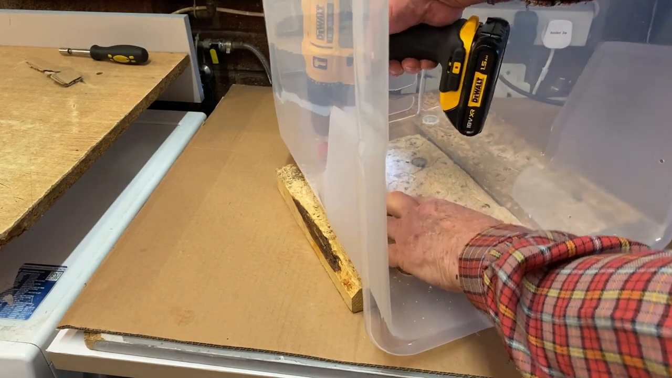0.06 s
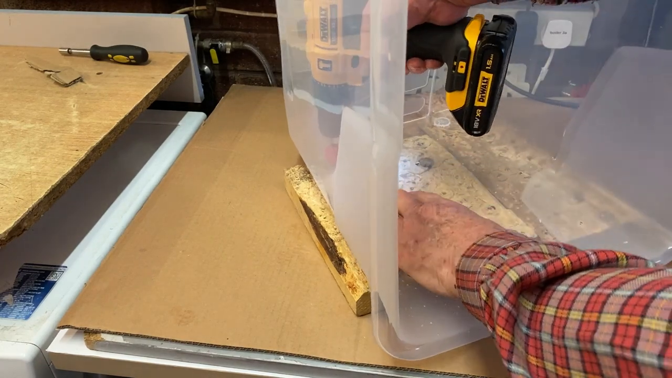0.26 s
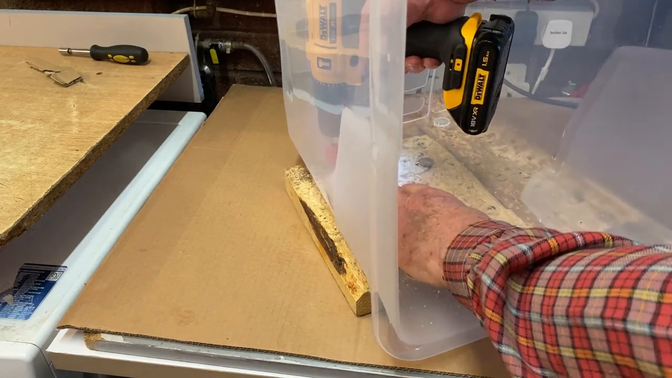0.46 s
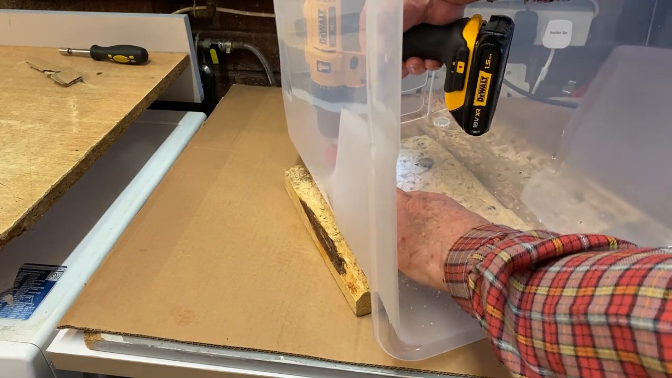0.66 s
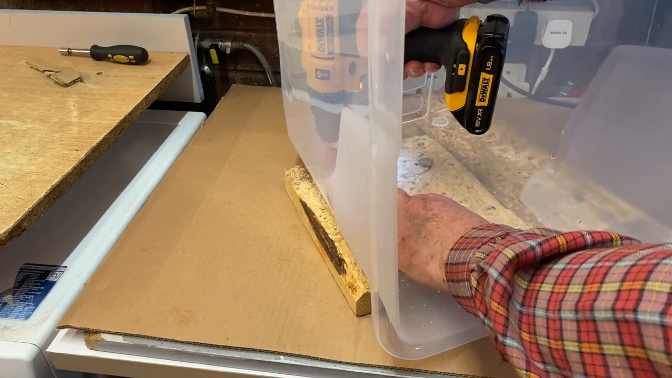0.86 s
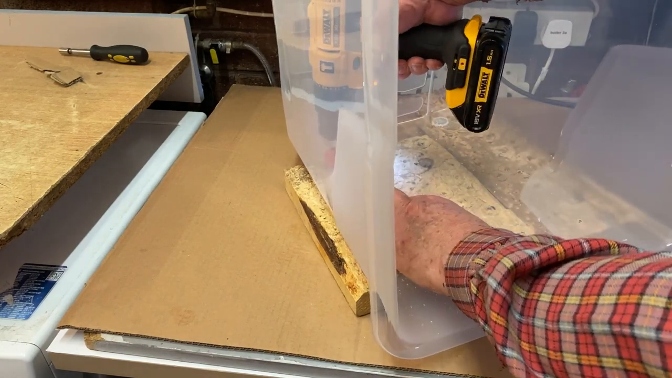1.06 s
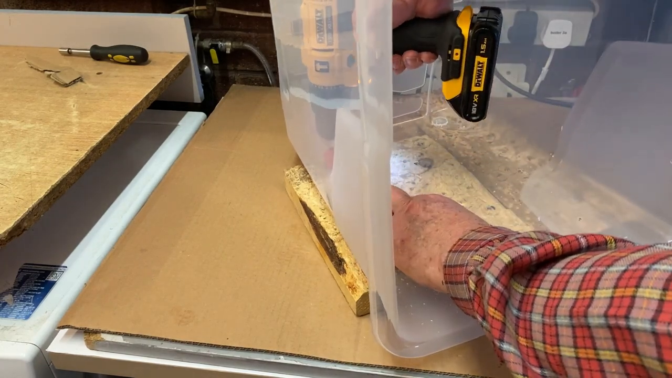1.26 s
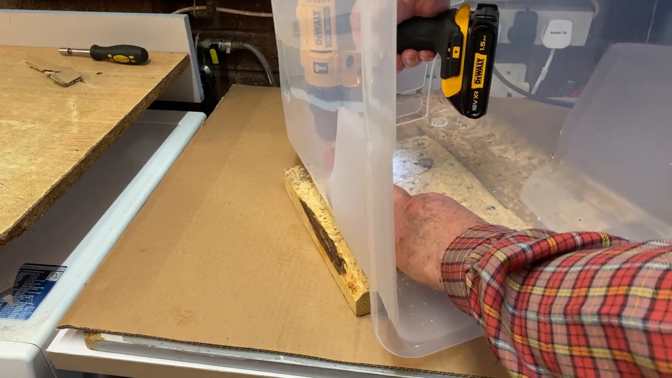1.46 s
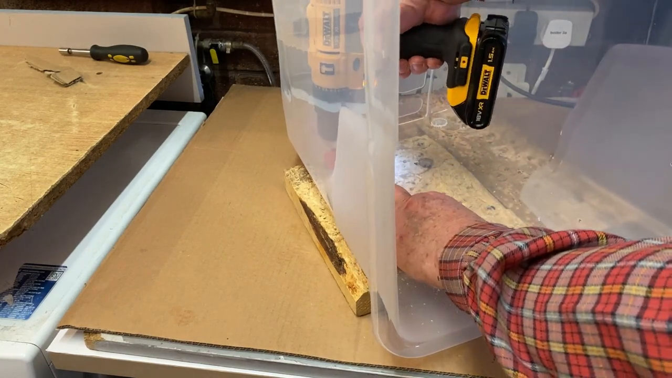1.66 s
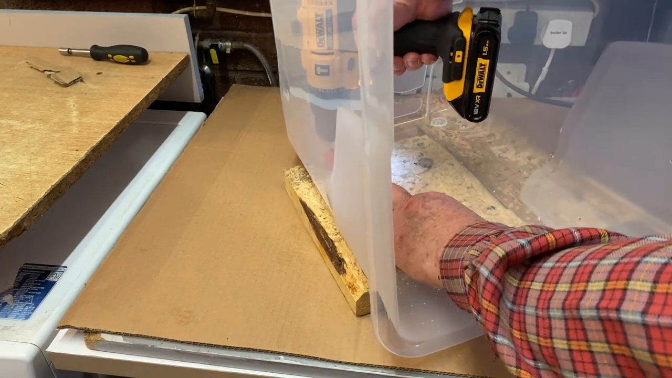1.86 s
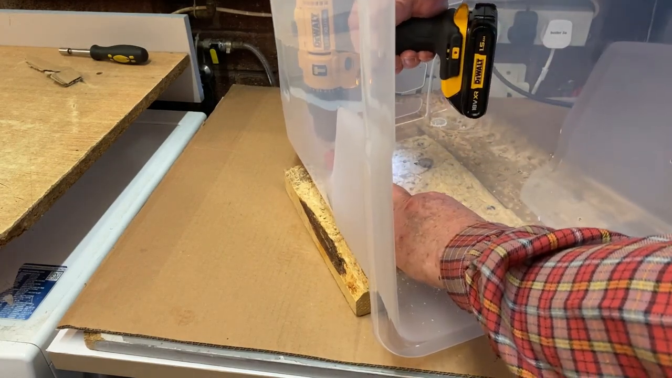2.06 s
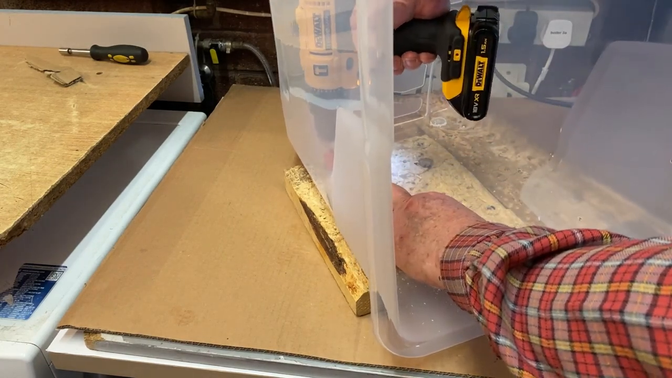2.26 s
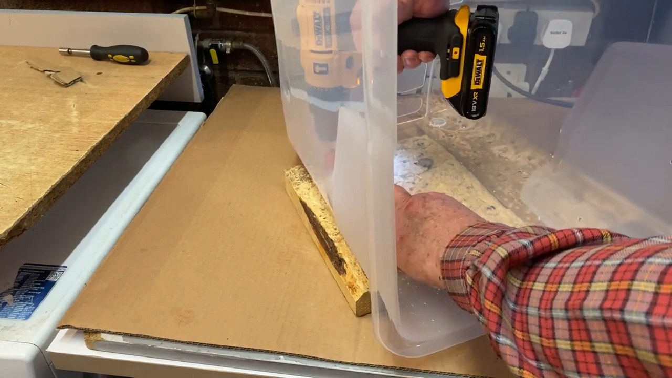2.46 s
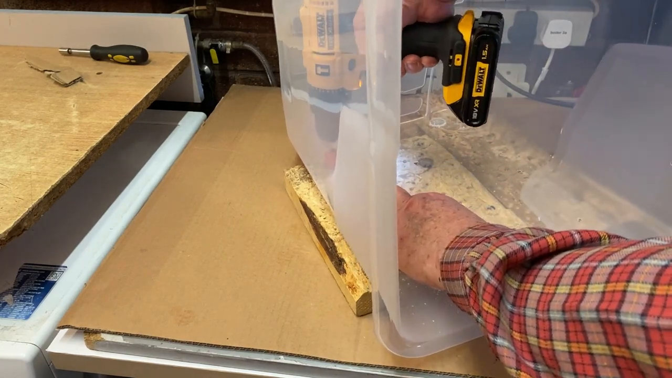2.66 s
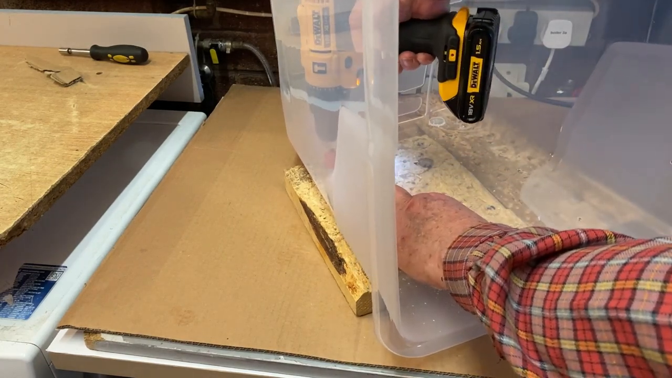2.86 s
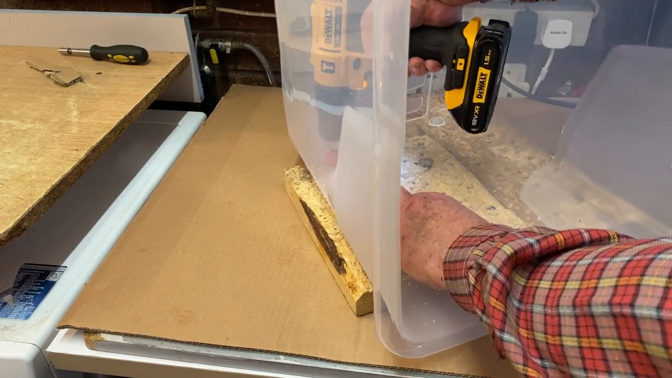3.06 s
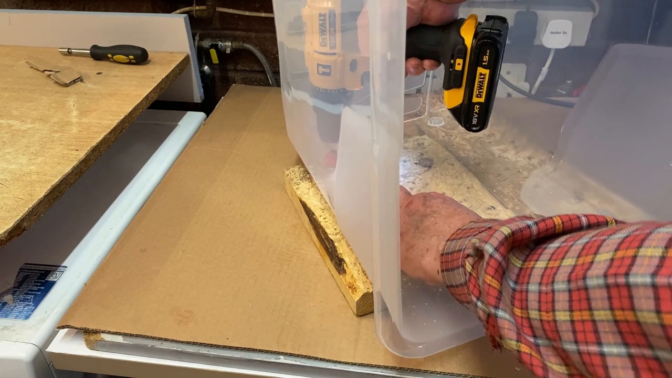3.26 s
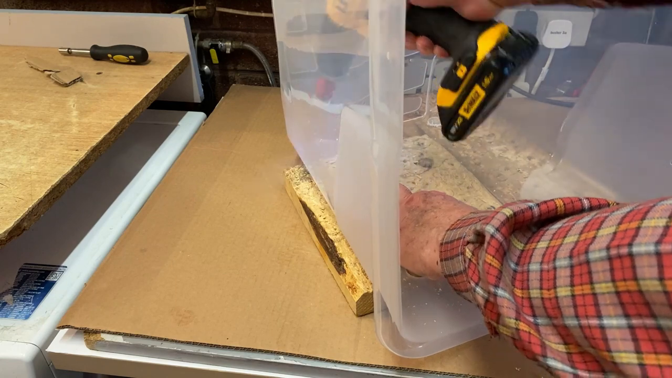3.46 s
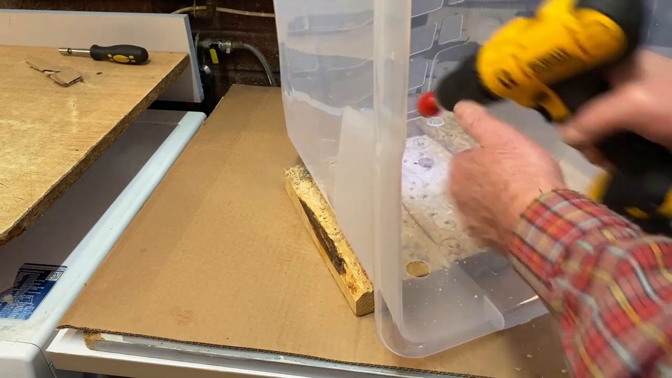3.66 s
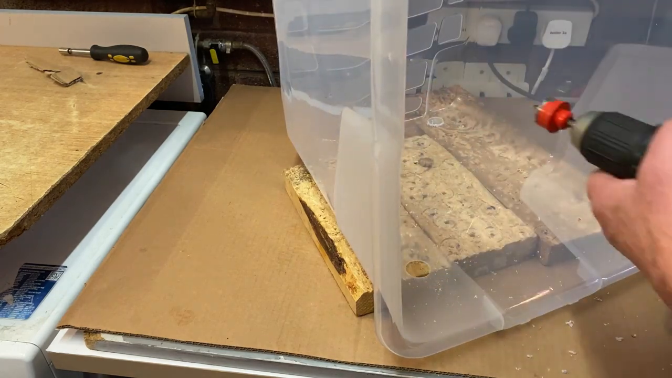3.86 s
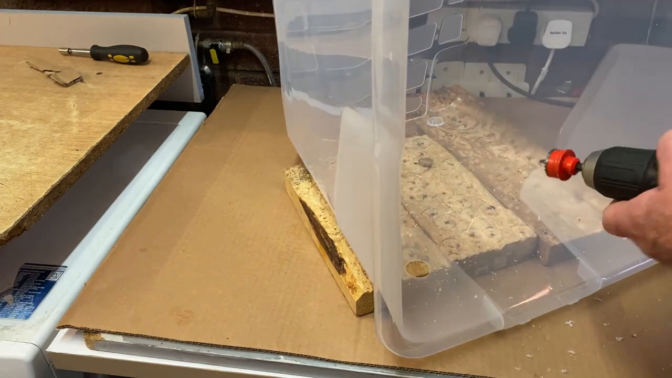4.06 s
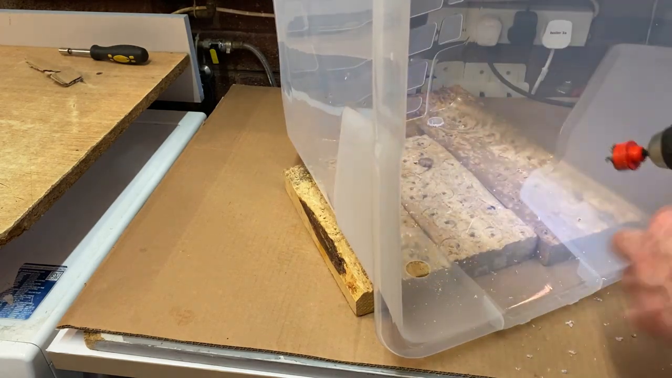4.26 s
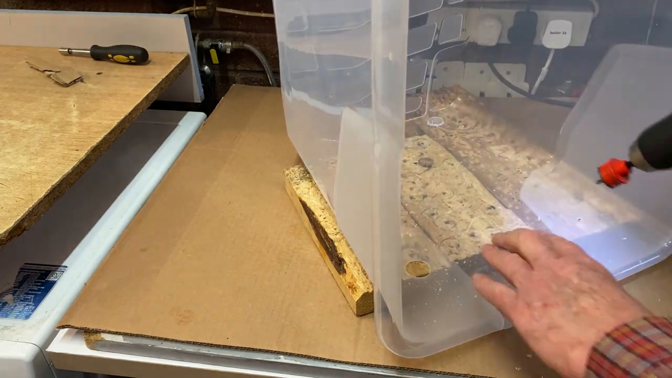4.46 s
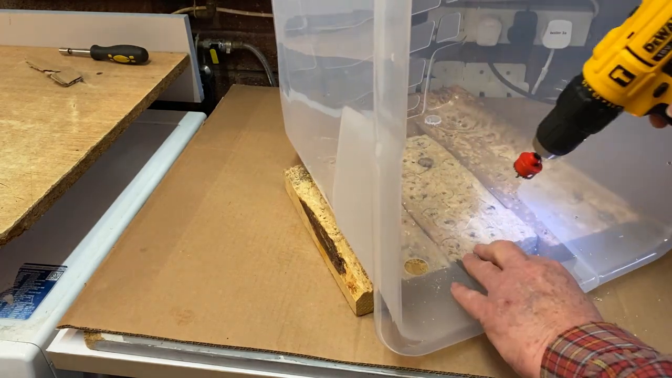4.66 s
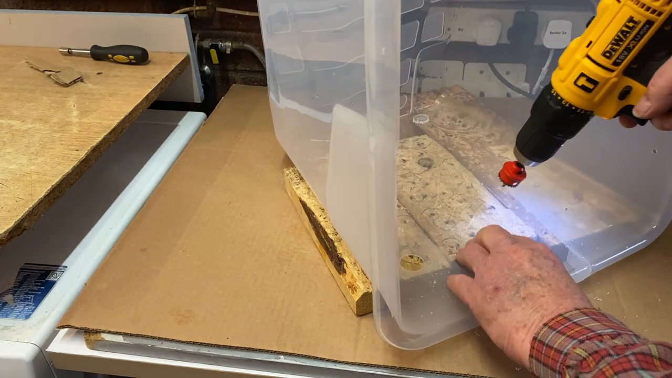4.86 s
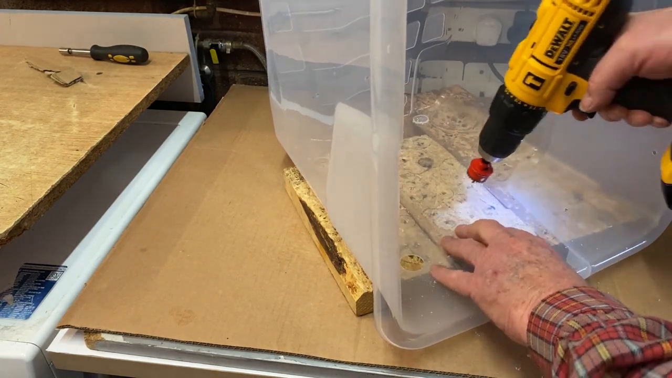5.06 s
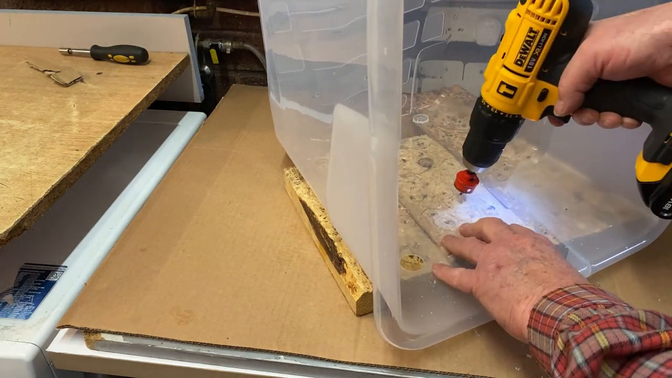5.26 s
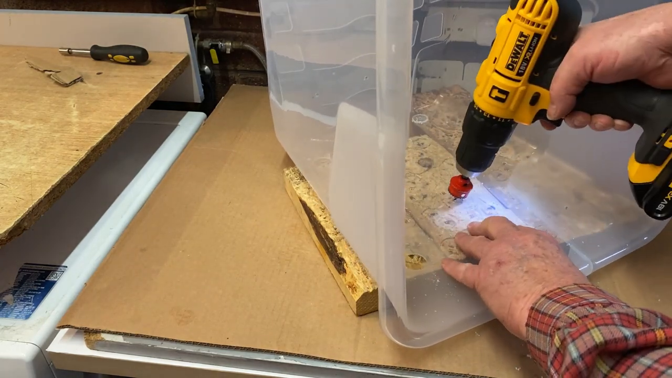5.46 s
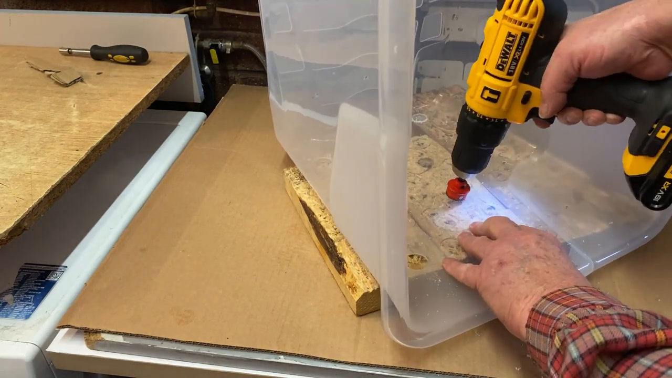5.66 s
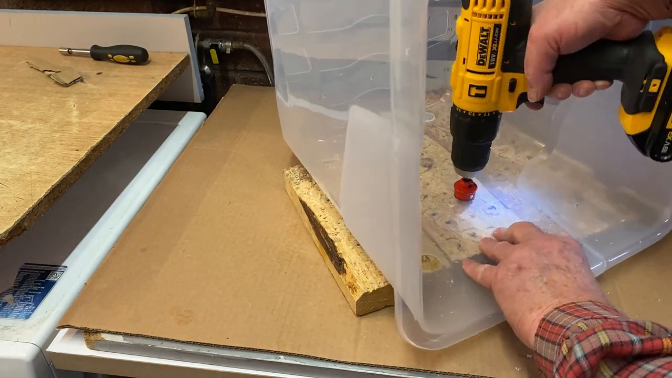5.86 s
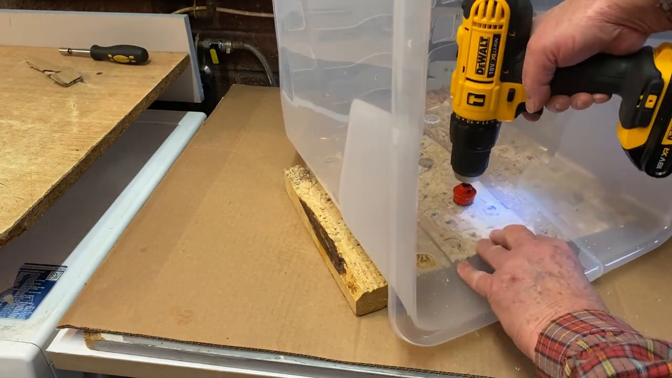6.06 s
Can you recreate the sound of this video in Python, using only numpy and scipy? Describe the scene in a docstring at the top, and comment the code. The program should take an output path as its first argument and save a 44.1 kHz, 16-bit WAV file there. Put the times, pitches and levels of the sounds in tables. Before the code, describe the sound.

Plastic box knocks, then a whining drill rasps and buzzes through its wall, brakes sharply, and leaves light handling bumps in a quiet workshop.

```python
"""Drilling a thin plastic box

A cordless drill drives a small hole saw through the wall of a plastic storage box on a workshop bench.
Gears are clicks coloured into hiss and mesh bands; sines at multiples of armature speed whine.
Saw teeth excite the wall modes and chatter by stick and slip; the braked chuck stops with a clack.
Before and after, pushes on the box modes make knocks and uneven grains make rubbing, in a faint shop hush."""
import sys
import numpy as np
from scipy import signal
from scipy.fft import rfft, irfft
from scipy.io import wavfile

SR = 44100
rng = np.random.default_rng(int(sys.argv[2]) if len(sys.argv) > 2 else 0)


def inscribe(sig):
    """Save sig as 16-bit PCM at rate SR to the path in sys.argv[1].

    A 1-D sig is mono; a 2-D sig holds one channel per row.
    Samples are clipped to [-1, 1] before scaling.
    """
    pcm = np.round(np.clip(np.atleast_2d(sig).T, -1, 1) * 32767)
    wavfile.write(sys.argv[1], SR, pcm.astype(np.int16))


N = 269010

# deep modes of the box: freq_hz, level_db, t60_s
DEEP_MODES = [(67, -6.5, 0.31), (95.8, -5.5, 0.17), (162, -3.5, 0.059)]
# low modes of the box: freq_hz, level_db, t60_s
LOW_MODES = [(208.6, -5, 0.098), (251, 0.5, 0.04), (276, -1, 0.033), (442.5, -11, 0.037),
             (566, -15.5, 0.0063), (355, -11.5, 0.023)]
# modes of the box wall, free to ring: freq_hz, level_db, t60_s
WALL_MODES = [(430, -10, .07), (590, -5, .04), (770, -8, .04), (900, -9, .03), (1110, 0, .055),
              (1400, 3.5, .05), (1614, -9, 0.033), (1760, -10.5, 0.04), (1985, 3.5, .045), (2090, -7, .03),
              (2260, -6.5, .035), (2768, -6, .025), (3000, -7, .03)]


def amp(db):
    """Amplitude ratio of a level in dB."""
    return 10 ** (np.asarray(db) / 20)


def rms_one(x):
    """Scale to an RMS of 1."""
    return x / np.sqrt(np.mean(x ** 2) + 1e-20)


def band_filter(x, order, corner_hz, kind="low"):
    """Butterworth filter."""
    return signal.sosfilt(signal.butter(order, corner_hz, kind, fs=SR, output="sos"), x)


def in_time(rows):
    """Columns after start_s, interpolated to sample curves."""
    s, *columns = np.transpose(rows)
    return [np.interp(np.arange(N) / SR, s, c) for c in columns]


def on_grid(points):
    """A (freq_hz, level_db) table interpolated over log frequency at every FFT bin."""
    bins_hz = np.maximum(np.arange(N // 2 + 1) * SR / N, 1)
    points_hz, points_db = np.array(points).T
    return np.interp(np.log(bins_hz), np.log(np.maximum(points_hz, 1)), points_db)


def coloured(x, spectrum):
    """Shape the spectrum, then scale to an RMS of 1."""
    return rms_one(irfft(rfft(x) * amp(on_grid(spectrum)), N))


def drift(rate_hz):
    """Slow random curve of RMS 1: noise through two equal poles."""
    r = np.exp(-2 * np.pi * rate_hz / SR)
    noise = rng.standard_normal(N + SR)
    settled = signal.lfilter([1], [1, -2 * r, r * r], noise)[SR:]
    return rms_one(settled)


def smeared(phase, width_hz, clean=0):
    """A tone spread into a narrow noise band around a clean core."""
    return (clean + drift(width_hz)) * np.sin(phase) + drift(width_hz) * np.cos(phase)


def grains(per_s, spread_db):
    """Random clicks of uneven size and either sign."""
    sizes = amp(spread_db * np.minimum(rng.exponential(1, N), 5)) * rng.choice([-1, 1], N)
    return sizes * (rng.random(N) < per_s / SR)


def swell(s, length, rise, fall):
    """Rises to 1 from s, holds, and dies away after s + length (all in seconds)."""
    t = np.arange(N) / SR - s
    opening = np.clip(t / rise, 0, 1) ** 2
    closing = np.clip((length + fall - t) / fall, 0, 1) ** 2
    return opening * closing


def ring(force, modes):
    """A force drives a bank of damped resonators of alternating sign."""
    out = np.zeros(N)
    for k, (hz, db, t60) in enumerate(modes):
        r, w = amp(-60 / (t60 * SR)), 2 * np.pi * hz / SR
        mode = signal.lfilter([0, np.sin(w)], [1, -2 * r * np.cos(w), r * r], force + 1e-18)
        out += (-1) ** k * amp(db) * mode
    return out


def echoes(x, t60):
    """A dense dying spray of reflections of unit energy."""
    t = np.arange(int(t60 * SR)) / SR
    spray = rng.standard_normal(SR)[:len(t)] * amp(-60 * t / t60)
    return signal.fftconvolve(x, spray / np.sqrt(np.sum(spray ** 2)))[:N]


def hush():
    """The air of the shop as uneven coloured noise, plus a faint smeared hum."""
    # shop air: freq_hz, density_db_per_hz
    air_spectrum = [(30, -0.5), (50, -8), (90, 4.5), (130, -11.5), (200, -13.5), (400, -16), (1000, -22),
                    (2000, -26.5), (8000, -41), (16000, -35.5)]
    air_db, waver_db, hum_hz, hum_db = -64.5, 2, 97, -69.5
    hum = amp(hum_db) * smeared(2 * np.pi * hum_hz * np.arange(N) / SR, 3, clean=0.51)
    air = coloured(rng.standard_normal(N), air_spectrum)
    return amp(air_db + waver_db * drift(2.7)) * air + hum


def running():
    """Drill levels in dB, gated by the trigger: sound swells up to full_s and dies after stop_s."""
    # running drill: start_s, gear_hiss_db, teeth_db, box_shaking_db, unbalance_db
    drill_rows = [(.815, -34, -38.5, -53.5, -65), (.85, -23, -28.5, -26, -51.5),
                  (.95, -18.5, -25.5, -32, -47), (1.08, -18.5, -25.5, -33, -39.5),
                  (1.22, -18, -26.5, -38.5, -41), (1.3, -17.5, -24, -40, -37.5),
                  (1.45, -19.5, -23.5, -38.5, -38.5), (1.62, -20, -26, -49, -41.5),
                  (1.8, -21, -29, -45.5, -38.5), (2.1, -21.5, -27, -46.5, -38.5),
                  (2.4, -21.5, -27.5, -40.5, -41), (2.6, -22.5, -27, -38.5, -44.5),
                  (2.9, -22.5, -26, -41, -38), (3.06, -21.5, -26.5, -37.5, -57), (3.25, -22, -28, -39, -47),
                  (3.41, -23, -28.5, -39, -34.5)]
    full_s, rise_db_per_s, stop_s, fall_db_per_s = 0.817, 2192.5, 3.385, 498
    t = np.arange(N) / SR
    opening_db, closing_db = (t - full_s) * rise_db_per_s, (stop_s - t) * fall_db_per_s
    trigger_db = np.minimum(0, np.minimum(opening_db, closing_db))
    return np.array(in_time(drill_rows)) + trigger_db, trigger_db


def strokes():
    """Level curves of scuff and rustle as skin, sleeve and tool slide on plastic."""
    # strokes: start_s, length_s, dull_scuff_db, bright_rustle_db
    stroke_rows = [(-.03, 0.11, -58.5, -54.5), (0.086, 0.14, -61, -57), (0.232, 0.12, -57, -65.5),
                   (0.37, .11, -66.5, -71), (0.496, 0.076, -66.5, -66), (.53, 0.036, -80, -67),
                   (0.58, 0.075, -69, -74), (0.689, 0.033, -59.5, -60), (0.754, 0.064, -57, -58),
                   (3.414, 0.18, -67.5, -68.5), (3.586, 0.12, -65, -66), (3.72, 0.11, -67, -59.5),
                   (3.819, 0.11, -71.5, -53), (3.932, 0.17, -89, -63), (4.116, 0.17, -99.5, -61),
                   (4.28, 0.26, -79.5, -82), (4.602, 0.37, -64.5, -74.5), (4.631, 0.066, -55, -71),
                   (4.687, 0.12, -66.5, -78), (4.804, 0.061, -69, -78), (4.861, 0.048, -62, -82),
                   (4.914, 0.11, -74.5, -79), (5.0, 0.36, -75.5, -72), (5.064, 0.055, -67.5, -65),
                   (5.122, 0.051, -62, -55), (5.226, 0.066, -67.5, -59), (5.293, 0.24, -73, -70),
                   (5.515, .04, -63.5, -86), (5.55, 0.094, -57.5, -80), (5.789, 0.087, -68, -75),
                   (5.841, 0.057, -57.5, -72.5), (5.884, 0.041, -52, -66), (5.903, 0.065, -44, -61),
                   (5.958, 0.081, -53, -73), (6.016, 0.072, -59.5, -69)]
    rise_share, fall_share = 0.35, 0.63   # of the stroke length
    return sum(amp([[scuff_db], [rustle_db]]) * swell(s, length, rise_share * length, fall_share * length)
               for s, length, scuff_db, rustle_db in stroke_rows)


def shaking():
    """Lumpy forces from drill, hands and strokes keep the low modes of the box sounding."""
    # hands shifting the box, a deep boom: start_s, level_db
    handling_rows = [(0, -37.5), (.13, -49), (.34, -51), (.54, -56.5), (.8, -43), (3.45, -51), (3.9, -58.5),
                     (4.15, -68), (4.5, -68.5), (4.7, -57), (5.3, -61.5), (5.55, -53.5), (5.75, -45.5),
                     (5.9, -48), (6.05, -27), (6.1, -61)]
    drill_thrum_db, scuff_thrum_db = 1, 3   # against the shaking, against the scuff
    shake = amp(running()[0][2])
    boom = rms_one(ring(rng.standard_normal(N) * amp(0.46 * drift(12)), DEEP_MODES))
    thrum = rms_one(ring(grains(900, spread_db=2.5), LOW_MODES))
    boom_level = np.maximum(shake, amp(in_time(handling_rows)[0]))
    thrum_level = amp(drill_thrum_db) * shake + amp(scuff_thrum_db) * strokes()[0]
    return boom_level * boom + thrum_level * thrum


def rubbing():
    """Fine grains of friction, uneven along each stroke; snags crackle in the wall."""
    # dull scuff: freq_hz, density_db_per_hz
    scuff_spectrum = [(200, -19.5), (500, 7), (1200, 1.5), (2500, -4), (5000, -23.5)]
    # bright rustle: freq_hz, density_db_per_hz
    rustle_spectrum = [(1200, -13.5), (2500, -4), (3200, -2), (3850, -1.5), (4600, -3), (5500, -5.5),
                       (7000, -2.5), (10000, -5), (16000, -4)]
    snags_per_s, snag_t60_s, crackle_db = 260, .006, -9   # crackle level against the scuff
    scuff = coloured(grains(2500, spread_db=3.0), scuff_spectrum)
    rustle = coloured(grains(9000, spread_db=3.5), rustle_spectrum)
    snag_decay = amp(-60 / (snag_t60_s * SR))
    snag_level = signal.lfilter([1], [1, -snag_decay], np.abs(grains(snags_per_s, spread_db=1.3)))
    crackle = rms_one(band_filter(snag_level * rng.standard_normal(N), 2, [700, 3500], "band"))
    layers = strokes() * [scuff + amp(crackle_db) * crackle, rustle]
    return amp(2.0 * drift(21)) * np.sum(layers, axis=0)


def squeak():
    """A faint squeak as the box slides: narrow rough bands that swell and fade together."""
    # squeak bands: freq_hz, level_db
    squeak_bands = [(1150, -74), (1980, -71), (2560, -73)]
    start_s, length_s, rise_s, fall_s = 0.275, 0.224, .05, 0.039
    t = np.arange(N) / SR
    bands = sum(amp(db) * smeared(2 * np.pi * hz * t, 30) for hz, db in squeak_bands)
    return swell(start_s, length_s, rise_s, fall_s) * bands


def saw_taps():
    """Saw cup taps the wall: each tap rings cup and wall around it, every mode with its own strength."""
    # taps: start_s, level_db
    tap_rows = [(3.7213, -31), (3.7242, -28), (3.728, -32), (5.925, -38), (5.942, -41), (6.039, -40)]
    # cup and surrounding wall: freq_hz, level_db, t60_s
    cup_modes = [(740, -4, .035), (900, -3, .02), (1080, -1, .025), (1400, -4, .02), (1700, -1, .02),
                 (2050, -6, .015), (2800, -3, .015), (3600, -8, .015), (5000, -12, .012)]
    strengths = amp(rng.normal(0, 0.97, (len(tap_rows), len(cup_modes))))
    tap_samples = [int(s * SR) for s, _ in tap_rows]
    tap_levels = amp([db for _, db in tap_rows])
    out = np.zeros(N)
    for mode, strength in zip(cup_modes, strengths.T):
        force = np.zeros(N)
        force[tap_samples] = tap_levels * strength
        out += ring(force, [mode])
    return out


def knocks():
    """Contacts push the low modes, force the wall roughly for milliseconds and crack dully."""
    # contacts: start_s, thump_db, deep_thud_db, wall_ring_db, crack_db
    knock_rows = [(0.0, -21, -57, -38, -50), (0.144, -19.5, -52, -38, -35), (0.219, -14.5, -44, -30, -38),
                  (0.23, -39, -29, -29, -34), (0.442, -44, -64, -71, -47), (0.575, -35, -32, -74, -64),
                  (0.722, -33, -25, -45, -60), (0.761, -55, -60, -46, -46), (0.779, -61, -46, -58, -42),
                  (.846, -12.5, -28, -46, -34), (0.86, -23, -32, -12.5, -28), (2.914, -51, -37, -37, -10),
                  (3.03, -18, -46, -12.5, -26), (3.3732, -23, -47.5, -11, -3), (3.375, -22, -53, -20, 0),
                  (3.382, -19.5, -49, -7.5, -29), (3.397, -22, -48, -40, -5.5), (3.408, -21, -31, -15, -11),
                  (3.633, -41, -62, -35, -56), (3.642, -38.5, -66, -64, -71), (3.678, -51, -69, -66, -51),
                  (3.718, -46, -70, -46, -29), (3.7206, -52, -66, -20, -18),
                  (3.804, -76, -73.5, -38.5, -43), (4.017, -51, -57.5, -51, -60.5),
                  (4.161, -74, -67, -60, -46), (4.303, -61.5, -68.5, -58, -65), (4.638, -51, -55, -47, -50),
                  (4.648, -38.5, -62, -36, -47), (4.661, -39, -43, -54, -42),
                  (4.689, -34, -53, -28.5, -38.5), (4.696, -32, -60, -64, -60), (4.786, -38, -59, -70, -61),
                  (4.859, -44, -79, -51, -44), (4.944, -44, -70, -53, -64), (5.08, -54, -69, -47, -56),
                  (5.17, -67, -74, -43, -51.5), (5.247, -74, -59, -70, -39), (5.454, -49, -53, -43, -42),
                  (5.462, -29.5, -46, -41, -66), (5.508, -61, -47, -51, -57), (5.536, -44, -61, -48, -64),
                  (5.557, -45, -69, -30.5, -37.5), (5.587, -28, -44, -36, -58), (5.596, -21, -31, -47, -58),
                  (5.619, -29.5, -32, -67, -67), (5.629, -39, -47, -44, -60), (5.654, -54, -60, -44, -43.5),
                  (5.639, -17, -30, -75, -59), (5.658, -32.5, -22, -58, -62), (5.692, -37, -44, -48, -62.5),
                  (5.829, -35, -60, -70, -70), (5.857, -28.5, -39.5, -40, -54), (5.909, -44, -62, -50, -40),
                  (5.925, -24, -55, -32, -38), (5.929, -48, -60, -38, -41), (5.942, -47, -46, -45, -38),
                  (5.958, -15, -46, -50, -44), (5.971, -21, -26, -34, -52), (5.989, -21, -34, -48, -46),
                  (6.007, -31, -49, -58, -35), (6.017, -28, -50, -42, -60), (6.037, -32, -39, -33, -32.5),
                  (6.064, -29.5, -33, -70, -51)]
    force_t60_s, crack_t60_s, wall_rise_s, crack_rise_s = 0.024, 0.027, 0.0027, 0.0034
    held_t60_s = .016            # wall ring under a hand
    finger_hz, slap_db = 1230, 16.5   # force lowpass; broad slap against the ring
    knuckle_db = -7              # upper low modes, against the mean of thump and wall ring
    t = np.arange(1200) / SR
    noise = rng.standard_normal((len(knock_rows), 2, len(t)))
    rough = noise * amp(-60 * t / [[force_t60_s], [crack_t60_s]])
    wall_rise, crack_rise = np.minimum(t / wall_rise_s, 1), np.minimum(t / crack_rise_s, 1)
    deep, low, upper, wall, crack = np.zeros((5, N + len(t)))
    for (s, low_db, deep_db, wall_db, crack_db), (force, burst) in zip(knock_rows, rough):
        start = int(round(s * SR))
        span = slice(start, start + len(t))
        deep[start] += amp(deep_db)
        low[start] += amp(low_db)
        upper[start] += amp((low_db + wall_db) / 2 + knuckle_db)
        wall[span] += amp(wall_db) * force * wall_rise / np.sqrt(np.sum(force ** 2))
        crack[span] += amp(crack_db) * burst * crack_rise
    cracks = band_filter(crack[:N], 1, [800, 4200], "band")
    push = band_filter(wall[:N], 2, finger_hz)
    slap = amp(slap_db) * band_filter(push, 1, 350, "high")
    held_modes = [(hz, db, held_t60_s) for hz, db, _ in WALL_MODES]
    body = ring(deep[:N], DEEP_MODES) + ring(low[:N], LOW_MODES[:3])
    body += ring(low[:N] + upper[:N], LOW_MODES[3:])
    soft_body = band_filter(body, 2, 600)   # flesh and rubber touch softly
    return soft_body + ring(push, held_modes) + slap + cracks


def chatter():
    """Teeth grab the wall, stick and slip: a wavering buzz whose overtones come and go on their own."""
    # grabs: start_s, length_s, first_hz, last_hz, level_db
    grab_rows = [(2.429, 0.093, 573.7, 578.4, -31), (2.518, 0.086, 572.6, 573, -31.5),
                 (2.628, 0.057, 535, 575.4, -25.5), (2.754, 0.12, 533, 591.4, -30.5),
                 (2.873, 0.16, 580, 561.5, -28)]
    # overtones: multiple, level_db
    overtones = [(1, -3), (2, -6), (4, -25.5)]
    rise_s, fall_s = 0.0099, 0.034
    pitch_rows = []
    for s, length, first_hz, last_hz, _ in grab_rows:
        pitch_rows += [(s, first_hz), (s + length - .001, last_hz)]
    hz, = in_time(pitch_rows)
    level = sum(amp(db) * swell(s, length, rise_s, fall_s) for s, length, *_, db in grab_rows)
    phase = 2 * np.pi * np.cumsum(hz * (1 + 0.01188 * drift(27))) / SR
    buzz = sum(amp(db) * rms_one(smeared(k * phase, 25 * k, clean=1.8)) for k, db in overtones)
    return level * buzz


def teeth():
    """Dense bites in uneven bursts excite the wall modes above a broad scrape."""
    # scrape: freq_hz, density_db_per_hz
    scrape_spectrum = [(200, -13), (400, 0.5), (700, -3.5), (1500, 1.5), (2500, 0), (3500, -1.5),
                       (6000, -30)]
    # wall ring against scrape as the saw is pressed in: start_s, level_db
    wall_rows = [(.85, -1.5), (1.15, -2.5), (1.45, -1.5), (1.65, -3.5), (2.0, -3.5), (2.4, -2), (2.8, -2.5),
                 (3.1, -2.5), (3.4, -3)]
    wander_db, flare_db, flare_hz = 1.5, 2.6, 24   # each mode sways as the saw rocks, and flares
    bursts = amp(1.2 * drift(24))
    bites, scrape = grains(5000, spread_db=0.0) * bursts, grains(4000, spread_db=0.5) * bursts
    wall = np.zeros(N)
    for mode in WALL_MODES:
        wall += amp(wander_db * drift(3.0) + flare_db * drift(flare_hz)) * ring(bites, [mode])
    return rms_one(rms_one(wall) * amp(in_time(wall_rows)[0]) + coloured(scrape, scrape_spectrum))


def gears(turn):
    """Tooth clicks hiss once-per-turn uneven, uneven teeth smear mesh tones into bands, housing rings."""
    # gear hiss: freq_hz, density_db_per_hz
    hiss_spectrum = [(1500, -10.5), (2600, -8), (3300, 0.5), (3900, -3.5), (4500, -4), (5500, 0.5),
                     (6300, -1.5), (8000, 2), (10000, -3), (12500, -2), (14100, -1), (15000, -1),
                     (16000, 4)]
    # mesh bands: multiple_of_speed, width_hz, level_db
    mesh_bands = [(13.14, 170, -17), (14.64, 91, -17), (17.9, 100, -25.5), (36.6, 300, -36)]
    # gear housing: freq_hz, level_db, t60_s
    housing_modes = [(4780, 0, 0.0053)]
    housing_db = -12   # against the hiss
    hiss = coloured(grains(14000, spread_db=2.0), hiss_spectrum) * (1 + 0.2 * np.sin(turn))
    mesh = sum(amp(db) * smeared(multiple * turn, width_hz) for multiple, width_hz, db in mesh_bands)
    housing = rms_one(ring(grains(14000, spread_db=0.0), housing_modes))
    return hiss + mesh + amp(housing_db) * housing


def armature(turn, unbalance_db, trigger_db):
    """Unbalance and commutator sing nearly clean, low multiples smeared; the first gear stage drones."""
    # armature tones: start_s, third_multiple_db, sixth_multiple_db, commutator_whistle_db
    tone_rows = [(.82, -57, -67, -63), (.96, -36, -56, -53.5), (1.08, -36.5, -50, -41.5),
                 (1.2, -36.5, -48, -41.5), (1.25, -31.5, -52, -34.5), (1.31, -37, -48, -33),
                 (1.4, -32, -43.5, -31.5), (1.55, -40.5, -52.5, -35), (1.63, -43.5, -56.5, -35),
                 (1.77, -46, -68.5, -34), (1.81, -46.5, -50.5, -41), (1.85, -37, -44, -34.5),
                 (2.1, -44.5, -60, -33), (2.22, -50, -73, -42), (2.4, -37, -72, -34.5),
                 (2.55, -41, -41, -39.5), (2.7, -42, -58, -32.5), (2.8, -37, -36.5, -35),
                 (2.88, -34.5, -46, -42), (2.915, -44, -24, -57), (2.95, -38, -40.5, -48.5),
                 (3.03, -50.5, -35, -33.5), (3.08, -46, -39, -64), (3.15, -42, -43, -47),
                 (3.2, -35.5, -43, -38), (3.32, -44.5, -42.5, -35.5), (3.38, -36, -53.5, -41.5)]
    # weak tones: multiple_of_speed, level_db against the third
    weak_tones = [(2, -12), (4, -12.5), (5, -4.5)]
    # drone: start_s, level_db
    drone_rows = [(.9, -41.5), (1.15, -34), (1.3, -44), (1.6, -45.5), (1.8, -44.5), (2.0, -48.5),
                  (2.35, -46.5), (2.5, -49.5), (3.4, -60)]
    stage_ratio = 3.8                  # armature turns per turn of the first stage
    tone_width_hz, clean = 16, 1.2     # smear of the low tones, their clean core
    waver_rad, flicker_db = .5, 1.2    # whistle phase and level wander, RMS
    third_db, sixth_db, whistle_db = in_time(tone_rows) + trigger_db
    whistle_level = amp(whistle_db + flicker_db * drift(12))
    whistle = whistle_level * np.sin(30 * turn + waver_rad * drift(15))
    drone_level = amp(in_time(drone_rows)[0] + trigger_db)
    drone = drone_level * rms_one(smeared(turn / stage_ratio, 3.6, clean=2.5))
    low = sum(amp(db) * smeared(k * turn, tone_width_hz, clean) for k, db in [(3, 0)] + weak_tones)
    sixth = smeared(6 * turn, 2 * tone_width_hz, clean)
    steady = np.sqrt(2) * (amp(unbalance_db) * np.sin(turn) + whistle + drone)
    return steady + amp(third_db) * low + amp(sixth_db) * sixth


def drill():
    """Gears and armature share one turning phase: running up, sagging under load, braked; teeth on top."""
    # armature speed: start_s, speed_turns_per_s
    speed_rows = [(.8, 220), (.86, 320), (1.0, 358), (1.07, 368.5), (1.15, 380), (1.26, 380.5),
                  (1.4, 376.3), (1.6, 374.5), (1.68, 372.2), (1.78, 372), (1.82, 365.5), (1.85, 366.7),
                  (1.89, 370.5), (1.95, 372.7), (2.05, 372.7), (2.13, 373.3), (2.27, 371.3), (2.39, 373.3),
                  (2.42, 372), (2.45, 367), (2.55, 365.7), (2.6, 367.5), (2.65, 368), (2.77, 375.3),
                  (2.86, 373.6), (2.9, 370.8), (2.97, 368), (3.02, 365), (3.04, 360.5), (3.11, 363),
                  (3.17, 370), (3.2, 375), (3.26, 375), (3.33, 379.5), (3.37, 380), (3.42, 200)]
    speed, = in_time(speed_rows)
    turn = 2 * np.pi * np.cumsum(speed) / SR
    (gear_db, teeth_db, _, unbalance_db), trigger_db = running()
    tones = armature(turn, unbalance_db, trigger_db)
    return amp(gear_db) * gears(turn) + tones + amp(teeth_db) * teeth()


def scene():
    """Sources and hush in the middle, with shop reflections common to both ears and unlike ones."""
    # unlike reflections: freq_hz, side_minus_mid_db
    side_spectrum = [(40, -30.5), (130, -31), (260, -25.5), (330, -21), (550, -13), (800, -11.5),
                     (1500, -14.5), (2400, -16.5), (3500, -14.5), (5500, -12.5), (6200, -10), (7000, -49),
                     (16000, -23.5)]
    early_t60_s, shop_t60_s = .08, 0.17
    common_db, late_side_db = -12, 8   # common reflections; late unlike ones against the early
    mid = hush() + shaking() + rubbing() + squeak() + saw_taps() + knocks() + chatter() + drill()
    unlike = echoes(mid, early_t60_s) + amp(late_side_db) * echoes(mid, shop_t60_s)
    side = irfft(rfft(unlike) * amp(on_grid(side_spectrum)), N)
    return mid + amp(common_db) * echoes(mid, shop_t60_s) + side * [[1], [-1]]


def record(dry):
    """Two microphone ports: the left lags in the treble by a phase slope; bottom and top are cut."""
    port_lag_s, port_from_hz, low_cut_hz, top_stop_hz = .000244, 6900, 35, 16100
    bins_hz = np.arange(N // 2 + 1) * SR / N
    phase = -2 * np.pi * port_lag_s * np.maximum(bins_hz - port_from_hz, 0)
    turned = irfft(rfft(dry) * np.exp(.5j * phase * [[1], [-1]]), N)   # half to each side
    turned = band_filter(turned, 2, low_cut_hz, "high")
    return signal.sosfilt(signal.cheby2(16, 75, top_stop_hz, fs=SR, output="sos"), turned)


dry = scene()
out = record(dry)
inscribe(out)
```